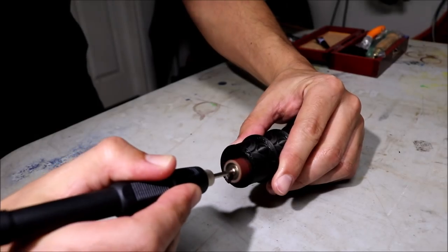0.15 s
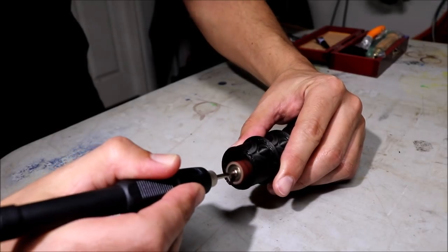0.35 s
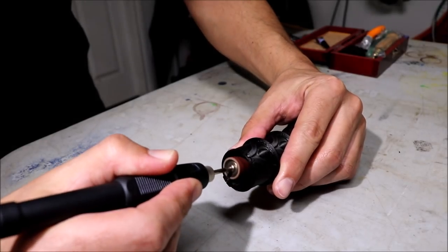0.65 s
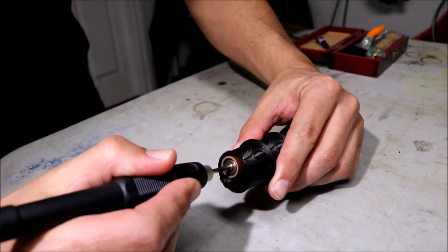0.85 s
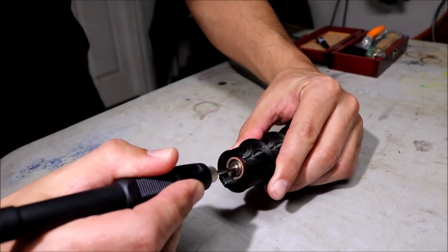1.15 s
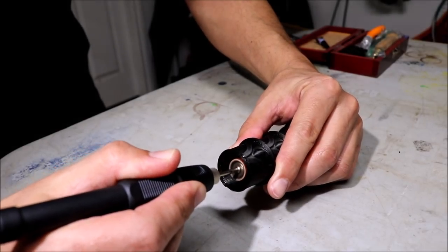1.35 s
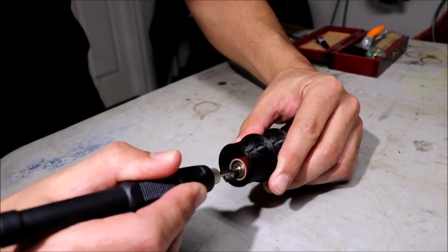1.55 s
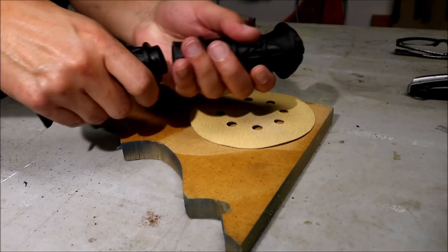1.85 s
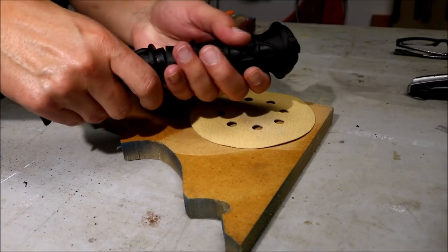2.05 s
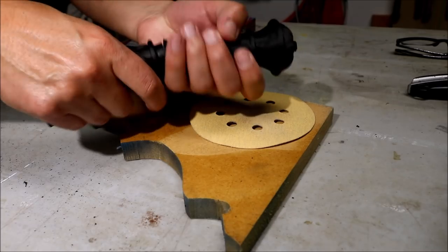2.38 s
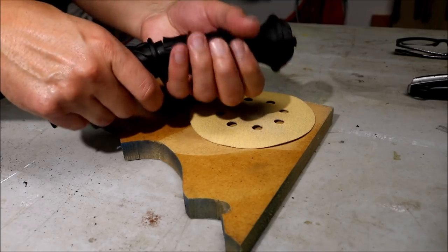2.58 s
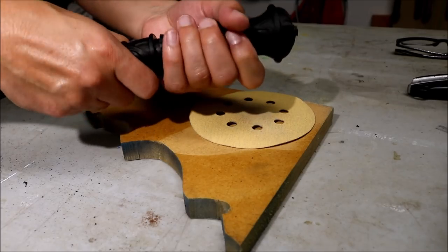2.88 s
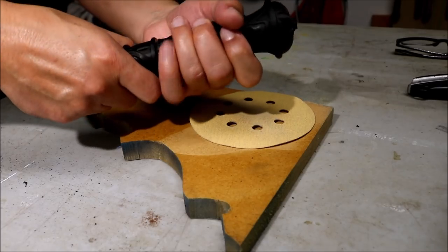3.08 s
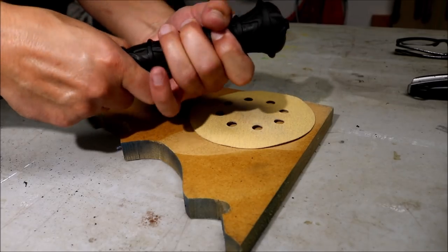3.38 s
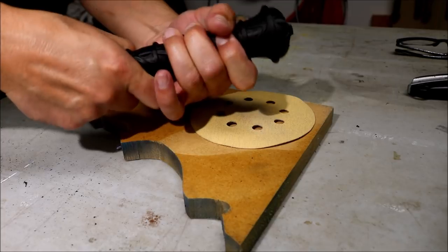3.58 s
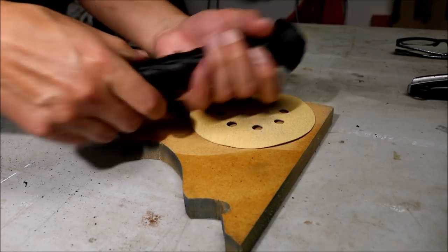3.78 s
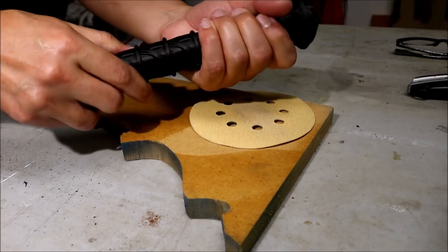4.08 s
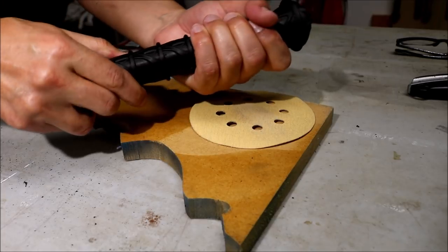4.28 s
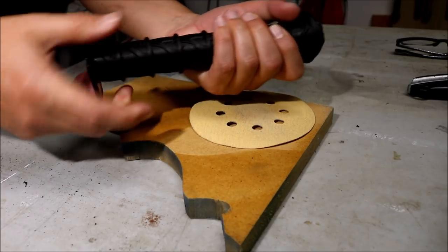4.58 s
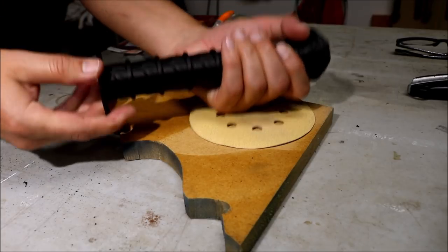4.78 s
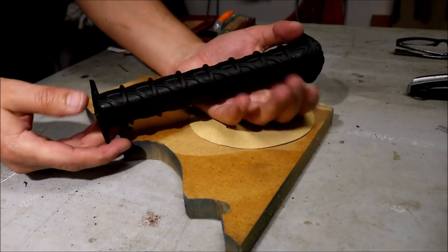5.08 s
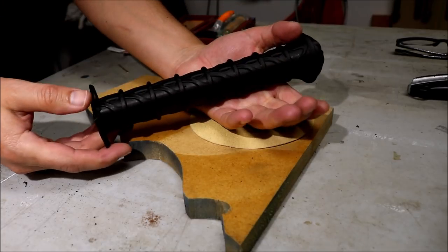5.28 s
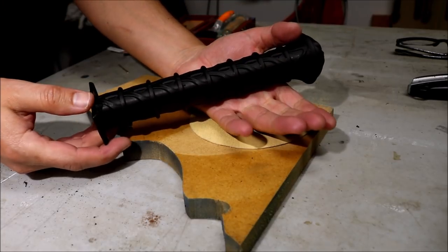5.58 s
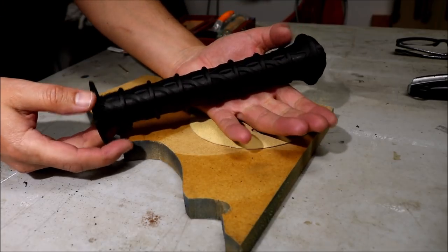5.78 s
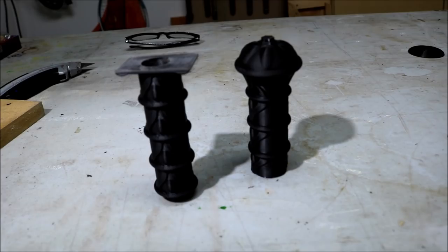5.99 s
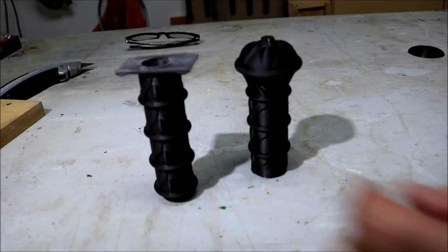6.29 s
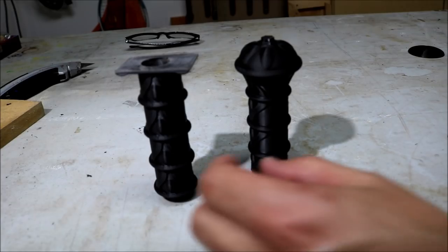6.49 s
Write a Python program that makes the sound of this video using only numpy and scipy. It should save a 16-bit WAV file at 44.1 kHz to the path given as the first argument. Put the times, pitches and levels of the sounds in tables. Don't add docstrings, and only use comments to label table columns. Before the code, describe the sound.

Raspy grinding on a plastic tube bogs down and stops abruptly; skin rubs, a joint ticks, a bench thuds softly, then sharp plastic bounces.

```python
import sys
import numpy as np
from scipy import signal
from scipy.io import wavfile
from scipy.ndimage import uniform_filter1d

SR = 44100
rng = np.random.default_rng(int(sys.argv[2]) if len(sys.argv) > 2 else 0)


def int16_out(signal):
    q = np.round(np.clip(np.atleast_2d(signal).T, -1, 1) * 32767)
    wavfile.write(sys.argv[1], SR, q.astype(np.int16))


def volts(x):
    e = np.asarray(x, float) / 20
    return 10 ** e


N = 293039
TOOL_N = 2 * SR

# (frequency [Hz], left-right likeness [-])
LIKENESS = [(60, 0.61), (180, 0.92), (550, 0.78), (1650, 1), (4970, -0.49), (15000, -1.48)]
# (start [s], end [s], level of the short dull tail [dB])
SCENE_CHANGES = [
    (1.827, 1.861, -31),
    (5.934, 5.968, -17),
]


def rms_one(x):
    return x / np.sqrt(np.mean(x ** 2) + 1e-20)


def even(v):
    power = np.mean(np.atleast_2d(v) ** 2, axis=0)
    return v / np.sqrt(uniform_filter1d(power, size=2600) + 1e-12)


def in_time(rows, silent=-120):
    s, *columns = np.transpose(rows)
    return [np.interp(np.arange(N) / SR, s, c, silent, silent) for c in columns]


def at_hz(points, hz):
    return np.interp(np.log(hz), np.log(np.array(points)[:, 0]), np.array(points)[:, 1])


def drift(rate, size=N):
    r = np.exp(-80 * np.pi * rate / SR)
    white = rng.standard_normal(size // 40 + 2002)
    slow = signal.lfilter([1], [1, -2 * r, r * r], white)[2000:]
    return np.interp(np.arange(size) / 40, np.arange(len(slow)), rms_one(slow))


def band(x, low_hz, high_hz):
    return signal.sosfilt(signal.butter(2, [low_hz, high_hz], "band", fs=SR, output="sos"), x)


def resonate(x, peaks):
    out = 0
    for k, (hz, width_hz, db) in enumerate(peaks):
        r = np.exp(-np.pi * width_hz / SR)
        top = (-1) ** k * volts(db) * (1 - r * r) / 2
        poles = [1, -2 * r * np.cos(2 * np.pi * hz / SR), r * r]
        out = out + signal.lfilter([top, 0, -top], poles, x + 1e-18)
    return out


def gliding(x, hz, width_hz):
    out, state = np.zeros_like(x), np.zeros((2, 2))
    r = np.exp(-np.pi * width_hz / SR)
    for i in range(0, TOOL_N, 128):
        poles = [1, -2 * r * np.cos(2 * np.pi * hz[i] / SR), r * r]
        out[:, i:i + 128], state = signal.lfilter([1 - r, 0, r - 1], poles, x[:, i:i + 128], zi=state)
    return out


def strike(s, hz, db, t60, rise=0.0034):
    out, at = np.zeros(N), round(s * SR)
    t = np.arange(min(N - at, int(t60 * SR))) / SR
    swell = 1 - np.exp(-t / rise)
    out[at:at + len(t)] = volts(db - 60 * t / t60) * swell * np.sin(2 * np.pi * hz * t)
    return out


def coloured(spectrum, likeness, patchy_db, size=N):
    low_end, high_end = np.array(spectrum)[[0, -1], 0]
    edges = np.geomspace(low_end, high_end, int(2.5 * np.log2(high_end / low_end)) + 2)
    out, white = 0, rng.standard_normal((2, 2, size))
    for k, (low, high) in enumerate(zip(edges, edges[1:])):
        mid, side = band(white[k % 2], low, high)
        hz = np.sqrt(low * high)
        alike = np.clip(at_hz(likeness, hz), 0, 1)
        gain = volts(at_hz(spectrum, hz) + patchy_db * drift(8.3, size=size))
        out = out + gain * (np.sqrt(1 + alike) * mid + np.sqrt(1 - alike) * side * [[1], [-1]])
    return rms_one(out)


def shop(x):
    t60_s, wall_cut_hz = 0.72, 9400
    t = np.arange(SR) / SR
    common, *own = rng.standard_normal((3, SR))
    own = np.array(own)
    echoes = band(common, 117.0, 970.0) + band(own, 590.0, wall_cut_hz)
    echoes = echoes + 0.565 * band(own, wall_cut_hz, 9405) * volts(-40 * t / t60_s)
    echoes = echoes * volts(-60 * t / t60_s) * np.clip(t / 0.0019, 0, 1)
    echoes = echoes / np.sqrt(np.sum(echoes ** 2) / 2)
    return signal.fftconvolve(x[None], echoes, axes=1)[:, :len(x)]


def digs():
    # (centre [s], half length [s], bite [dB], shell [dB], rim [dB])
    swells = [(0.1, 0.095, 0.5, -1, -6), (0.234, 0.031, -1.5, -1.5, -4), (0.396, 0.028, 3, -1, 5),
              (0.44, 0.018, 0.5, 0, -4), (0.488, 0.027, 5, 3, -32), (0.605, 0.035, 2.5, 1.5, 3),
              (0.637, 0.025, -6, -2, -21), (0.731, 0.015, 3, 0.5, -34), (0.796, 0.024, -4.5, -3.5, -22),
              (0.835, 0.037, 5.5, 1.5, -2), (.88, 0.013, -5.5, 0, 8), (0.939, 0.031, 3, 4.5, 7),
              (1.024, 0.022, -4, 2, 3), (1.048, 0.015, 2.5, -3, 2.5), (1.116, 0.029, -7.5, -5, -36),
              (1.16, .02, 1, -3, -8), (1.195, 0.018, -2, 0, 4.5), (1.26, 0.015, -7.5, -0.5, -13),
              (1.276, 0.029, 5.5, 4, 3), (1.31, 0.0085, -11, -1.5, 1), (1.4, 0.01, 4.5, 0, -4),
              (1.452, 0.022, -2.5, 1.5, 10), (1.52, 0.019, 0, -2.5, 4), (1.623, 0.021, -1, -0.5, 10),
              (1.693, 0.015, 1, -0.5, 8), (1.732, 0.02, -2, -0.5, 12), (1.761, 0.0099, 6.5, 4, 0)]
    s, half, *db = np.transpose(swells)
    return np.array(db) @ np.exp(-((np.arange(TOOL_N) / SR - s[:, None]) / half[:, None]) ** 2)


def knocks(turns_hz, turn, bite_hz, shell_hz, press, repeats):
    light = [-13, -11, -15, -4, -13, -13, -10, -1, -8, -4, -7, -3, -1, -3, -9, -8, -2, -6, -8]
    heavy = [3, 5, 4, 3, 1, 4, 2, -2, 0, -2, 1, 0.5, 0, -1, -2, 4, 1, 7, 5]
    # (centre [s], half length [s], depth [0-1])
    skips = [
        (1.62, .075, 1),
    ]
    hollow_rings = [(1350, 5), (1850, 6.5), (1490, -3.5)]   # Hz, dB

    def bell(offset_hz, width_hz):
        return 1 / (1 + (offset_hz / width_hz) ** 2)

    low, high = np.zeros(TOOL_N), np.zeros(TOOL_N)
    for order in range(4, 31):
        last = min(order, 22)
        light_db = light[last - 4] - 3 * (order - last)
        heavy_db = heavy[last - 4] - .6 * (order - last)
        hz = order * turns_hz
        lift_db = 8 * bell(hz - bite_hz, 400)
        lift_db += 6 * press * bell(hz - shell_hz, 250)
        lift_db += 12.0 * press * bell(hz - 1.32 * bite_hz, 250)
        lift_db += 7.9 * repeats * press * bell(hz - bite_hz, 250)
        locked = np.clip((repeats - .76) / .14, 0, 1)
        lift_db += 9 * locked * bell(hz - bite_hz, 220)
        lift_db += press * sum(db * bell(hz - ring_hz, 120) for ring_hz, db in hollow_rings)
        wander_db = (1 + .22 * min(order, 15) * press) * drift(9, size=TOOL_N)
        slip = (.12 + .0008 * order ** 2 * press) * drift(30, size=TOOL_N)
        smear = 2 * np.arctan((hz - bite_hz) / 300) + .7 * np.arctan((hz - shell_hz) / 250)
        slip -= (.2 + .8 * press) * smear
        level = volts(light_db + press * (heavy_db - light_db) + lift_db + wander_db)
        wave = level * np.cos(2 * np.pi * order * turn + slip)
        upper = np.clip((hz - 2100) / 300, 0, 1)
        low += (1 - upper) * wave
        high += upper * wave
    t = np.arange(TOOL_N) / SR
    depth_now = sum(depth * np.exp(-((t - s) / half) ** 2) for s, half, depth in skips)
    skip = 1 + depth_now * np.cos(np.pi * turn)
    return even(low * skip), even(high * skip)


def motor(turn, lost_turns):
    # (order [-], light [dB], pressed [dB], gain in the grab [dB], gain once braced [dB])
    orders = [(1, -46.5, -50, 5, 8), (2, -48, -49, 10, 0.5), (3, -78, -45, 5, -2.5)]
    # (order [-], level [dB])
    whine = [(32, -45), (48, -47)]
    t = np.arange(TOOL_N) / SR
    grab_s, grab_rise_s, grab_fall_s = 0.714, 0.21, 0.032
    grab = np.exp(-((t - grab_s) / np.where(t < grab_s, grab_rise_s, grab_fall_s)) ** 2)
    braced = np.clip((t - 1.38) / 0.0617 + .5, 0, 1)
    touch = np.clip((t - .36) / 0.048, 0, 1)
    out = np.zeros(TOOL_N)
    for order, db, pressed_db, grab_db, braced_db in orders:
        level_db = db + touch * (pressed_db - db) + grab * grab_db + braced * braced_db
        level_db = level_db + 1.5 * drift(9.0, size=TOOL_N)
        out += volts(level_db) * np.sin(round(order) * (2 * np.pi * turn + 1) - 1)
    for order, db in whine:
        level_db = db - .5 * lost_turns + 2 * drift(8)[:TOOL_N]
        out += volts(level_db) * np.sin(2 * np.pi * order * turn)
    return out


def rotary_tool():
    # (time [s], speed [turns per s])
    speed = [(0, 226), (.412, 225.1), (.56, 216.3), (.7, 207), (.8, 198.5), (.952, 179.1), (1.1, 174.5),
             (1.35, 163), (1.63, 167), (1.8, 155.3), (1.83, 154.5)]
    # (time [s], bite [dB], share of the hollow shell [dB], wall ring [Hz], shell ring [Hz])
    contact = [(0, -23, -8, 3150, 1600), (.3, -23, -9.5, 3000, 1620), (.4, -24, -7.5, 3400, 1620),
               (.46, -23.5, -9.5, 2950, 1780), (.63, -23, -8.5, 3020, 1120), (.72, -23.5, -7.5, 3400, 1730),
               (.82, -25, -2.5, 3670, 1930), (.95, -27.5, -3, 3700, 1780), (1.05, -29.5, -2.5, 3840, 1880),
               (1.15, -26, -5, 3070, 1290), (1.23, -26.5, -2.5, 2950, 1290), (1.28, -28, -3, 3130, 860),
               (1.34, -28, -5.5, 3100, 1050), (1.42, -29.5, -4.5, 3620, 1170),
               (1.54, -31.5, -3, 3630, 1290), (1.59, -24.5, -6.5, 2950, 1200),
               (1.68, -27.5, -6, 3540, 1350), (1.83, -34.5, -1.5, 3300, 1340)]
    # (time [s], pressure [0-1], share of the contact that repeats every turn [0-1])
    hand = [(0, 0, .78), (.4, 0, .78), (.47, .1, .9), (.62, .5, .87), (.7, .6, .72), (.8, .69, .68),
            (1.2, .94, .68), (1.5, .8, .62), (1.56, .63, .6), (1.67, .7, .6), (1.71, .8, .2), (1.9, 1, .2)]
    # (time [s], ring [dB], ring [Hz])
    rim_path = [(0, -31, 4640), (.45, -36, 3850), (.6, -40, 4550), (.72, -29, 4400), (.85, -37.5, 3880),
                (1.05, -32, 3950), (1.15, -36, 4220), (1.3, -31, 4700), (1.36, -28, 4270),
                (1.45, -34, 3820), (1.55, -37.5, 3570), (1.83, -38, 3500)]
    # (frequency [Hz], width [Hz], level [dB])
    shell_rings = [(850, 200, -20), (1250, 150, 2), (1600, 150, -10), (1880, 150, 2)]
    # (frequency [Hz], width [Hz], level [dB])
    bite_rings = [(2670, 170, 6), (2930, 93, 14.5), (3574, 391.4, -39), (5200, 110, -22)]
    # (frequency [Hz], density [dB per Hz])
    grit_colour = [(2650, -15.5), (4500, 2.5), (4900, -8.5), (5420, -17), (5840, -11.5), (7410, -3.5),
                   (7770, -2.5), (8830, -14.5), (14000, -10.5), (16000, -13)]
    # (time [s], left minus right [dB])
    lean = [
        (0, 2),
        (.5, .5),
        (.75, -1),
        (1.1, -2.5),
        (1.4, -1),
        (1.83, -2),
    ]

    turns_hz = in_time(speed, silent=None)[0][:TOOL_N]
    bite_db, share_db, bite_hz, shell_hz = np.array(in_time(contact, silent=None))[:, :TOOL_N]
    press, repeats = np.clip(in_time(hand, silent=None), 0, .99)[:, :TOOL_N]
    rim_db, rim_hz = np.array(in_time(rim_path, silent=None))[:, :TOOL_N]
    bite_db, shell_db, rim_db = np.array([bite_db, bite_db + share_db, rim_db]) + digs()
    clean, loose = np.sqrt(repeats), np.sqrt(1 - repeats)
    lost_turns = 226 - turns_hz
    grit_db = -26 + 0.0053 * lost_turns + 0.39 * (bite_db - bite_db.mean())

    turn = np.cumsum(turns_hz) / SR
    force = volts(1.3 * rng.standard_normal(500))[(turn + .5).astype(int)]
    burst = force * np.exp(17.0 * (np.cos(2 * np.pi * (turn - .05)) - 1))
    white = rng.standard_normal((3, TOOL_N))
    grit = 0.21 * white[0] + 0.53 * white[1:]
    grit = grit * (.3 - 0.12 * press + burst)
    chatter = turn + .035 * loose ** 3 * drift(200, size=TOOL_N)
    landing = np.diff(np.maximum.accumulate(np.floor(chatter)), prepend=0)
    knock = landing * force * press

    shell = resonate(grit + 0.095 * white[1:], shell_rings)
    shell = shell + 0.17 * gliding(grit + 15.0 * knock, shell_hz, 240.0) + 0.21 * grit
    shell = loose ** 2 * volts(shell_db + 7) * even(band(shell, 1030.0, 2920.0))

    bite = (0.58 + 0.87 * press) * resonate(grit + 5.6 * knock, bite_rings)
    bite = bite + 1.64 * gliding(grit + 7.0 * knock, bite_hz, 360)
    bite = loose * volts(bite_db + 0.5) * even(bite + 0.016 * band(grit, 2900, 9100))

    hiss = coloured(grit_colour, LIKENESS, patchy_db=2.0, size=TOOL_N)
    hiss = volts(grit_db) * even(hiss * (1.0 - 0.39 * press + 0.87 * burst))
    hiss = hiss * volts(0.45 * drift(48, size=TOOL_N))
    collet_db = grit_db - 11.5 + 1.34 * drift(4.8, size=TOOL_N)
    hiss = hiss + volts(collet_db) * even(resonate(grit, [(7235.0, 200, 0)]))

    rim = grit + 10.0 * knock
    rim = gliding(rim, rim_hz, 360) - 0.94 * resonate(rim, [(5000, 170, 0)])
    rim = volts(rim_db) * even(rim)

    low, high = knocks(turns_hz, turn, bite_hz, shell_hz, press, repeats)
    shell = shell + clean * volts(shell_db + 2) * low
    bite = bite + clean * volts(bite_db - 1.54) * high
    tones = np.sqrt(2) * motor(turn, lost_turns)

    near = shell * volts([[-1.1], [1.1]]) + bite * volts([[-.7], [.7]]) + rim
    near = near + tones * volts([[-.6], [.6]]) + hiss * volts([[1.5], [-1.5]])
    near = near * volts(np.array([[.5], [-.5]]) * in_time(lean, silent=None)[0][:TOOL_N])
    rumble = volts(-49.5) * rms_one(band(band(white[0], 450, 2700), 220, 4700))
    out = band(near + rumble + volts(-10.5) * shop(near.mean(axis=0)), 90, 19000)
    out = np.pad(band(out, 95, 12500), ((0, 0), (0, N - TOOL_N)))
    return out * (np.arange(N) < SCENE_CHANGES[0][1] * SR)


def workshop():
    # (frequency [Hz], density [dB per Hz])
    air_colour = [(15, -44.5), (25, -26), (48, -35), (87, -9.5), (123, -15), (217, -7), (384, -13.5),
                  (607, -15), (677, -19), (734, -15.5), (936, -16.5), (2280, -20), (4250, -23.5),
                  (4870, -24), (16000, -33)]
    # (frequency [Hz], left-right likeness [-])
    air_likeness = [(60, 0.071), (240, 0.26), (950, 0.095), (3770, 0.036), (15000, 0.0446)]
    # (frequency [Hz], width [Hz], level [dB])
    hum_lines = [(57.5, 7, -64), (118.3, 6.3, -63.5), (380.2, 8.9, -70)]
    # (start [s], air [dB], hum [dB])
    backgrounds = [
        (0, -49.5, -1),
        (1.85, -53.5, 3),
        (5.96, -52.5, 7),
    ]
    white = rng.standard_normal(N)
    hum = sum(volts(db) * rms_one(resonate(white, [(hz, width_hz, 0)])) for hz, width_hz, db in hum_lines)
    s, air_db, hum_db = np.transpose(backgrounds)
    place = np.searchsorted(s[1:], np.arange(N) / SR)
    air = volts(air_db[place]) * coloured(air_colour, air_likeness, patchy_db=1.5)
    air = air + volts(hum_db[place]) * hum
    thin = signal.sosfilt(signal.butter(4, 75, "high", fs=SR, output="sos"), air)
    return np.where(place == 0, thin, air)


def ticks():
    # (time [s], peak [dB], ring [Hz], low knock [dB], pan [dB])
    slips = [(2.01, -38, 3480, -49, 13), (2.119, -34, 4306, -48, -4.5), (2.181, -33, 4070, -64, 1),
             (2.211, -41, 3678, -51, 9), (2.7475, -41.5, 4002, -58, -0.5), (2.888, -27.5, 2960, -59.5, -6),
             (2.964, -28.5, 2970, -47, -5.5), (3.081, -26, 3312, -42, 3), (3.1918, -23.5, 3330, -40, -3),
             (3.2262, -22, 3400, -34, -5.5), (3.3036, -27, 3480, -42, 1), (3.3275, -17.5, 3420, -40.5, -5),
             (3.3437, -34, 3719, -52, -8.5), (3.403, -30.5, 3170, -42.5, 0.5),
             (3.434, -40, 2930, -64.5, -7), (3.533, -22, 3140, -42, 8), (3.7338, -36, 3230, -73, 0),
             (3.761, -33, 3800, -71.5, -4), (3.7872, -38, 3870, -71, 0), (3.8431, -32, 3350, -70, -2),
             (3.933, -22, 4140, -70, 2), (3.944, -36, 3400, -70, -1.5), (4.0346, -32, 3600, -70, 0),
             (2.987, -27, 3320, -41, 0), (3.061, -28, 3120, -63, 0), (3.822, -26, 4200, -67.5, -1),
             (3.8817, -22, 3500, -68, -1), (3.915, -20, 3450, -65, 1), (4.219, -32.5, 2898, -63.5, 8),
             (4.5654, -33, 3570, -72, 14), (4.8889, -29.5, 4960, -65.5, 3), (6.178, -32, 3670, -50, -15)]
    out, snap = np.zeros((2, N)), rms_one(band(rng.standard_normal(N), 2800, 8400))
    for (s, db, hz, low_db, pan_db), (a, c) in zip(slips, rng.random((len(slips), 2))):
        tick = strike(s, hz, db + 4.5, 0.0046, rise=0.00097)
        tick += strike(s, hz * (1.026 + 0.35 * a), db + 0.5, 0.0048)
        tick += snap * strike(s, 78.0, db - 7.5, 0.013)
        tick += strike(s, 2260.0, db - 13.5, 0.012)
        tick += strike(s, 420 + 150 * c, low_db + 15.5, 0.0083)
        tick += strike(s, 1210.0, low_db, 0.018)
        tick += strike(s, 386, low_db + 1.5, 0.029)
        out += tick * volts(np.array([[.5], [-.5]]) * pan_db)
    return out


def strokes():
    # (start [s], hold [s], rub [dB], creak [dB], dryness [dB])
    drags = [(2.014, 0.004, -49, -50, 3), (2.02, .003, -45, -58, 7), (2.033, 0.0072, -45, -48, 5),
             (2.05, .006, -50.5, -52.5, 5), (2.1, 0.027, -51.5, -59, 7), (2.209, 0.007, -48.5, -54, 7.5),
             (2.364, .065, -48, -62, 8.5), (2.431, 0.08, -48.5, -63, 5.5), (2.58, 0.044, -63, -79, -5),
             (2.66, 0.023, -56, -66, -7), (2.75, 0.07, -47, -62, 6.5), (2.826, 0.05, -48, -55.5, 6.5),
             (2.886, 0.039, -43, -54.5, 4.5), (2.962, 0.042, -45, -61, 3), (3.066, 0.021, -48, -64, 2),
             (3.748, 0.016, -46.5, -63, 7), (3.776, .018, -52, -71.5, 9), (3.822, 0.003, -45, -77, 2),
             (3.832, .003, -44, -77, -1), (3.839, .01, -42, -77, 0), (3.872, .008, -45, -75, 6),
             (3.881, 0.0056, -38, -75, 0), (3.892, .015, -40, -75, 2), (3.898, .012, -38, -74, -3),
             (3.914, 0.012, -35.5, -70, -4), (3.93, 0.0084, -36.5, -76, -6), (3.943, 0.046, -40.5, -76, -1),
             (3.996, 0.058, -49.5, -84, 8), (4.219, 0.0089, -57, -66, 12), (4.523, 0.021, -55.5, -84, 11.5),
             (4.554, 0.054, -50, -86, -4), (4.693, 0.019, -60.5, -79, -2.5), (4.749, 0.12, -62, -81, 11),
             (4.878, 0.017, -49.5, -63, 11.5), (5.039, 0.061, -56, -60.5, 1.5),
             (5.919, 0.019, -51.5, -82, 11.5)]
    rise, sag, rub_fall, creak_fall = 2000, 81, 800, 900
    t = np.arange(N) / SR
    rub_db, creak_db, dry_db = np.full(N, -120.), np.full(N, -120.), np.zeros(N)
    for s, hold, db, dull_db, bright_db in drags:
        near = slice(round((s - .2) * SR), round((s + .4) * SR))
        early = np.maximum(s - t[near], 0)
        late = np.maximum(t[near] - s - hold, 0)
        shape = -rise * early - sag * np.clip(t[near] - s, 0, hold)
        level = db + shape - rub_fall * late
        dry_db[near] = np.where(level > rub_db[near], bright_db, dry_db[near])
        rub_db[near] = np.maximum(rub_db[near], level)
        creak_db[near] = np.maximum(creak_db[near], dull_db + shape - creak_fall * late)
    return rub_db, creak_db, dry_db


def rubbing():
    # (frequency [Hz], density [dB per Hz])
    rub_colour = [(880, -59), (1500, 5.5), (1830, -11), (2690, -2), (3350, -3), (4290, -15.5), (4730, -3.5),
                  (5380, -18), (5940, -20.5), (8320, -20.5), (16000, -49.5)]
    # (frequency [Hz], width [Hz], level [dB])
    rub_rings = [(2400, 120, -8), (3350, 220, 3), (4150, 250, 1), (5300, 320, -4), (6600, 550, -3),
                 (8500, 300, 0)]
    # (frequency [Hz], width [Hz], level [dB])
    squeak_ring = (640, 46, -55)
    rub_db, creak_db, dry_db = strokes()
    hiss = coloured(rub_colour, LIKENESS, patchy_db=3.5)
    hiss = rms_one(.25 * hiss + 2.6 * resonate(hiss, rub_rings)) * volts(2.5 * drift(150))
    crackle = rms_one(band(rng.standard_normal((2, N)), 5400, 13000))
    hiss = rms_one(hiss + volts(-18.5) * crackle * volts(2.306 * drift(151.5)))
    hiss += (volts(dry_db) - 1) * band(hiss, 5200, 15000)
    creak = band(rng.standard_normal(N), 487.2, 1064.3) * volts(2.0 * drift(60))
    hz, width_hz, db = squeak_ring
    slip = np.exp(-((np.arange(N) / SR - 2.44) / .04) ** 2)
    squeak = volts(db) * slip * even(resonate(creak, [(hz, width_hz, 0)]))
    rub = volts(rub_db + np.array([[-1.2], [1.2]])) * hiss
    return rub + volts(creak_db) * rms_one(creak) + squeak


def thuds():
    # (frequency [Hz], level [dB], t60 [s])
    thud_modes = [(89, -52, 0.12), (131, -43, .16), (148, -44, 0.16), (306, -40, 0.15), (375, -36.5, 0.11),
                  (425, -43, 0.14), (472, -45, 0.075)]
    nudge = strike(4.893, 70, -34, .05, rise=0.00055)
    return nudge + volts(7.0) * sum(strike(5.039, *mode, rise=0.0031) for mode in thud_modes)


def fall():
    # (time [s], crack peak [dB], bench peak [dB])
    bounces = [
        (6.2666, -2, -50),
        (6.3337, -19, -7.5),
        (6.366, -0.5, -27),
        (6.4061, -7.5, -48),
        (6.4312, -11, -47.5),
        (6.458, -32, -23),
        (6.489, -21, -15.5),
        (6.1787, -34.5, -70),
    ]
    # (frequency [Hz], level [dB], t60 [s])
    part_modes = [(1050, -0.5, 0.013), (1300, 3.5, 0.023), (1466, 4.5, 0.016), (1610, -8, 0.015),
                  (2210, -6.5, 0.054), (2643, 2, 0.031), (2950, -11, 0.026), (5150, -7, 0.014),
                  (7400, -14, 0.01)]
    # (frequency [Hz], level [dB], t60 [s])
    bench_modes = [(145, -9.5, 0.085), (208.6, -1.5, 0.2), (250, 1.5, 0.086), (313, -0.5, 0.073),
                   (406.4, 0.5, 0.11), (476, 1, 0.054), (727, -4, 0.03)]
    # (time [s], level [dB], share in the bench [dB])
    rolling = [
        (5.97, -94, 22),
        (6.262, -63, 6),
        (6.275, -36, 7),
        (6.315, -30.5, -0.5),
        (6.36, -27.5, -0.5),
        (6.435, -31, 1.5),
        (6.539, -35.5, 0.5),
        (6.64, -44.5, -2),
    ]
    # (frequency [Hz], width [Hz], level [dB])
    roll_rings = [(1350, 550, -1), (2450, 450, 2), (2950, 450, 1)]
    out, t = np.zeros(N), np.arange(N) / SR
    crackle = rms_one(band(rng.standard_normal(N), 900, 5460))
    snap = rms_one(band(rng.standard_normal(N), 4400, 14000))
    for (s, db, bench_db), luck in zip(bounces, rng.normal(0, 1, (len(bounces), 16))):
        for (hz, d, t60), z in zip(part_modes, luck):
            out += strike(s, hz, db - 13 + d + z, t60, rise=.0001)
        for (hz, d, t60), z in zip(bench_modes, luck[::-1]):
            out += strike(s, hz, bench_db - 8 + d + z, t60)
        since, after = np.maximum(t - s, 0), t >= s
        out += crackle * after * (volts(db - 13.5 - 20000 * since) + volts(db - 23.5 - 1000 * since))
        snap_db = db - 23 + 0.89 * max(db, -12)
        out += snap * after * (volts(snap_db - 5400 * since) + volts(db - 50 - 880 * since))

    part_db, share_db = in_time(rolling)
    white = rng.standard_normal((3, 2, N)) + 0.65 * rng.standard_normal((3, 1, N))
    boom = resonate(white[0] + 1.5 * white[0].mean(axis=0), [(hz, 90, d) for hz, d, t60 in bench_modes])
    buzz = resonate(resonate(white[1], roll_rings), roll_rings) + .5 * band(white[1], 900, 4200)
    scuff = band(white[2], 3000, 6800)
    roll = volts(part_db + share_db) * rms_one(boom) + volts(part_db) * rms_one(buzz)
    roll = roll + volts(part_db - 45) * rms_one(scuff)
    roll = roll * volts(1.2 * drift(80) + 1.5 * drift(300))
    return out * volts([[-1.3], [1.3]]) + volts(-9) * shop(out) + roll


def scene():
    hands = ticks() + thuds()
    hands = hands + volts(-17) * shop(hands.mean(axis=0))
    return rotary_tool() + workshop() + rubbing() + hands + fall()


def band_limit(x):
    return signal.sosfilt(signal.butter(12, 15990, fs=SR, output="sos"), x)


def record(dry):
    dry = signal.sosfilt(signal.butter(2, 35, "high", fs=SR, output="sos"), dry)
    t, out = np.arange(N) / SR, dry.copy()
    dull = signal.sosfilt(signal.butter(6, 4000, fs=SR, output="sos"), dry)
    for start, end, db in SCENE_CHANGES:
        gap = (t >= start) & (t < end)
        since = t[gap] - start
        out[:, gap] = dry[:, gap] * volts(-6000 * since) + dull[:, gap] * volts(db - 980.0 * since)
    out = signal.sosfilt(signal.ellip(12, .5, 50, 15800, fs=SR, output="sos"), out)
    return band_limit(np.clip(out, -1, 1))


dry = scene()
out = record(dry)
int16_out(out)
```